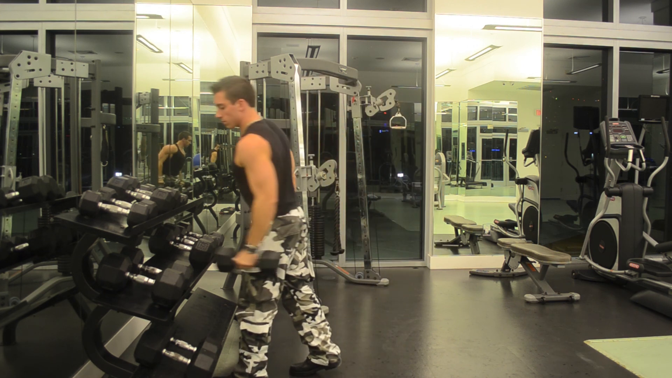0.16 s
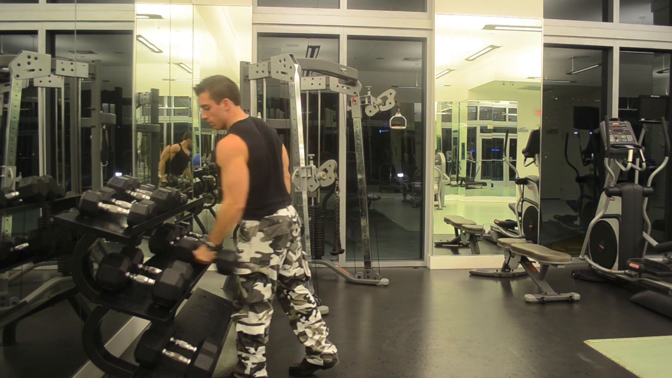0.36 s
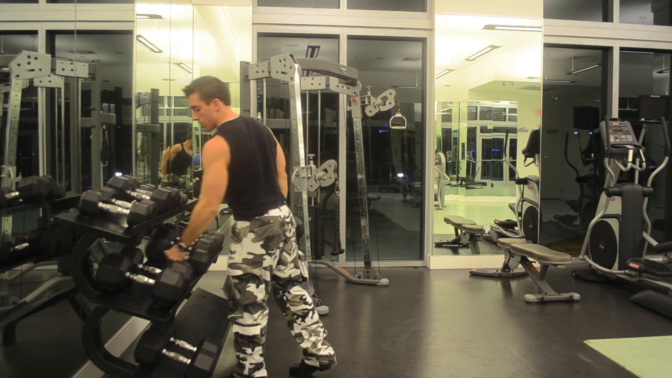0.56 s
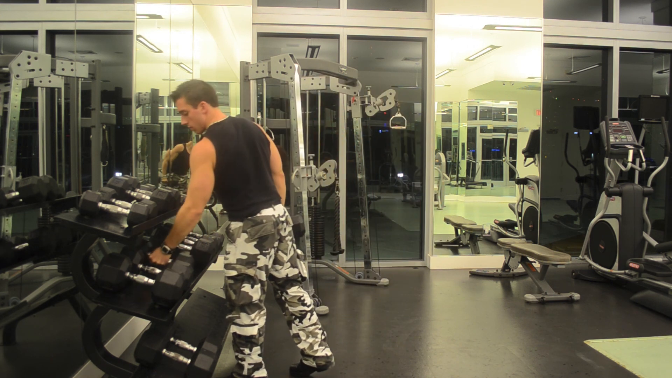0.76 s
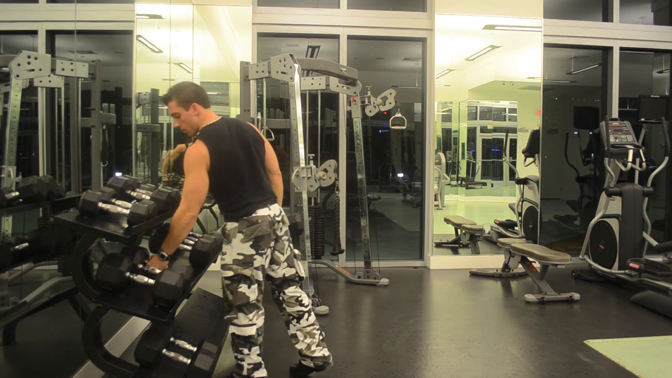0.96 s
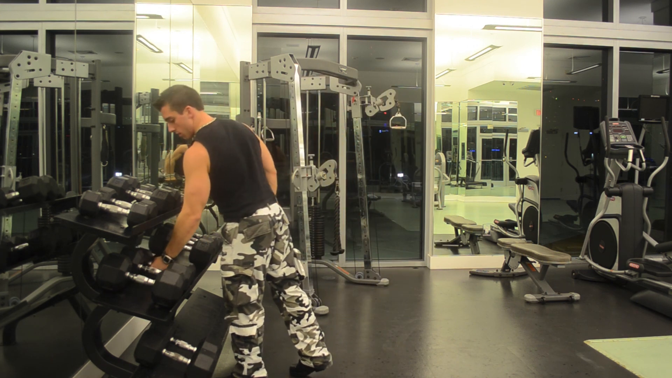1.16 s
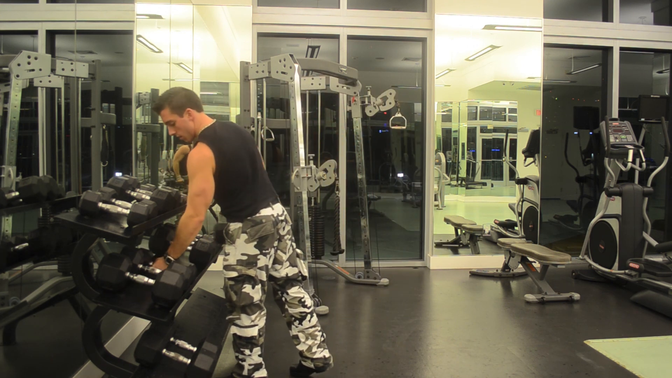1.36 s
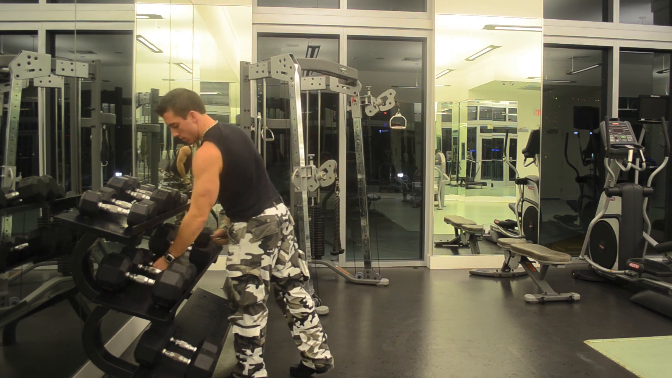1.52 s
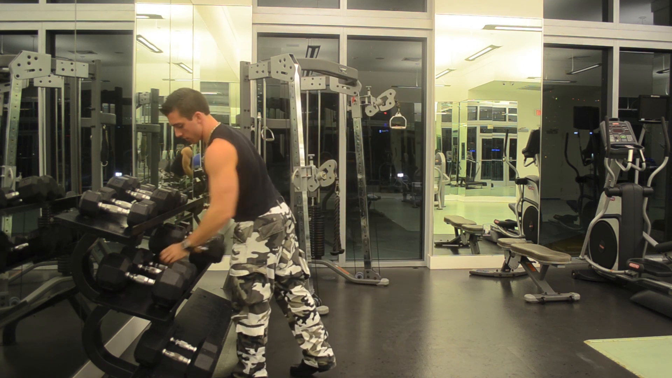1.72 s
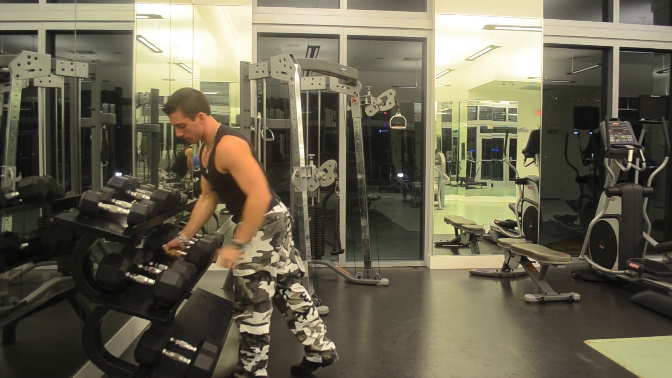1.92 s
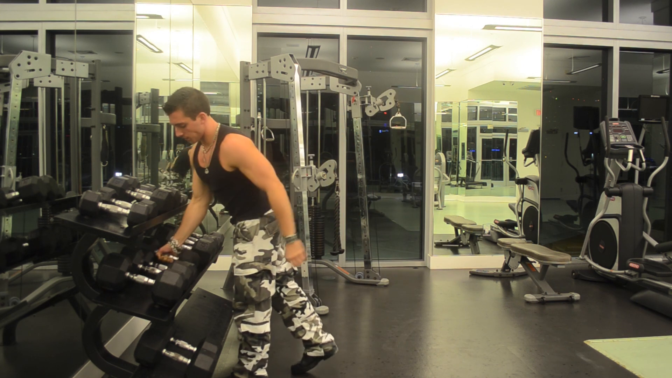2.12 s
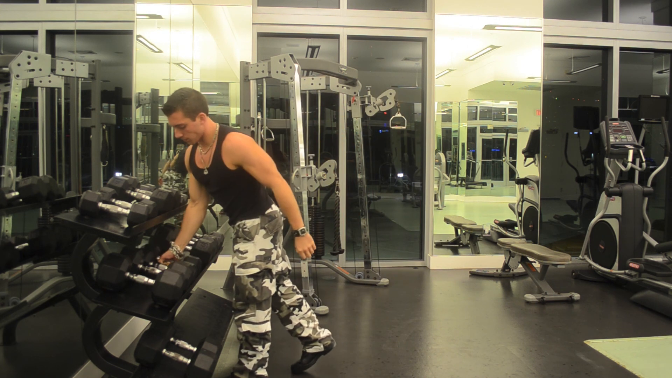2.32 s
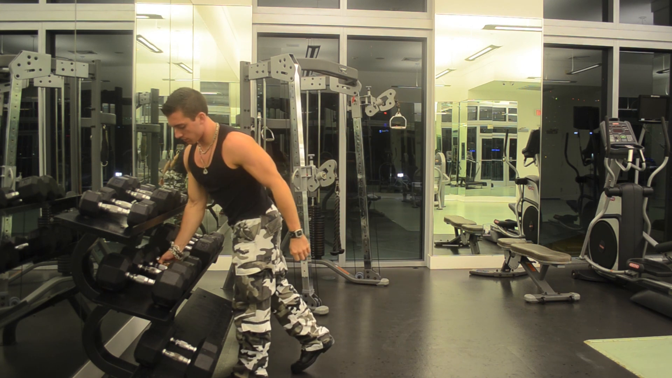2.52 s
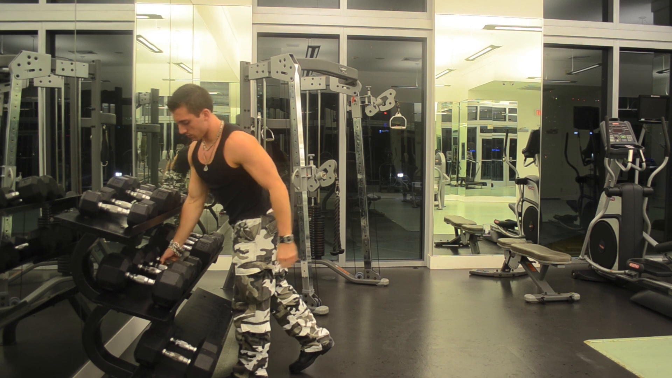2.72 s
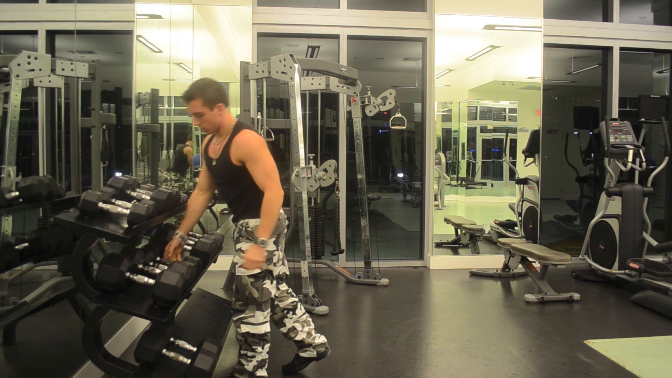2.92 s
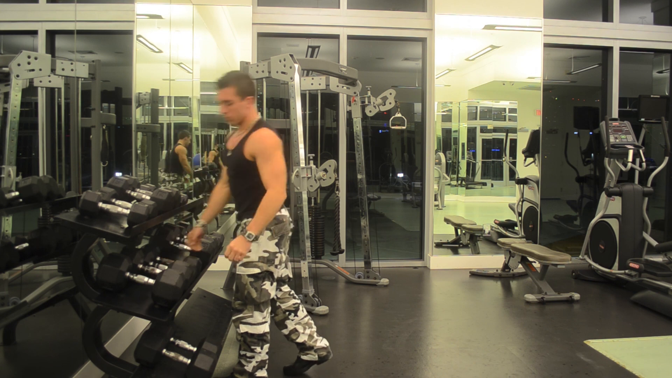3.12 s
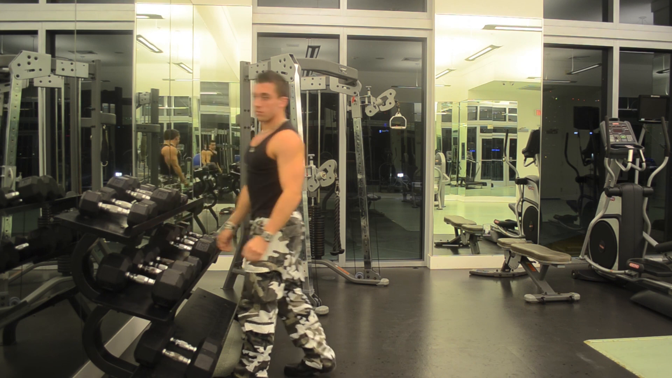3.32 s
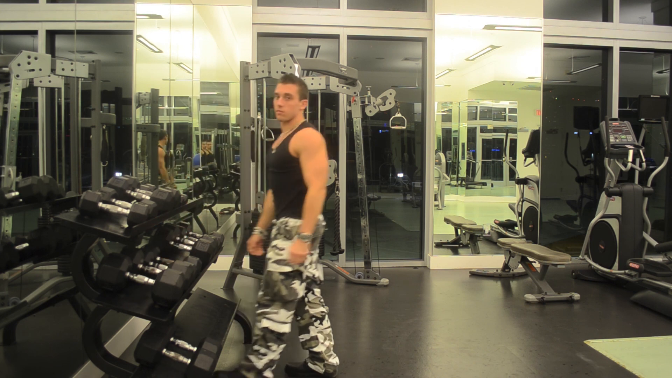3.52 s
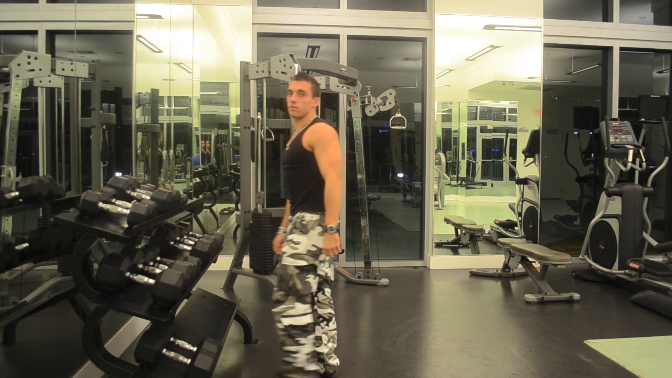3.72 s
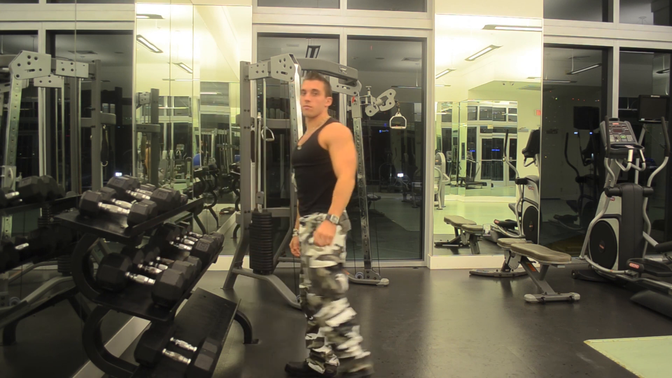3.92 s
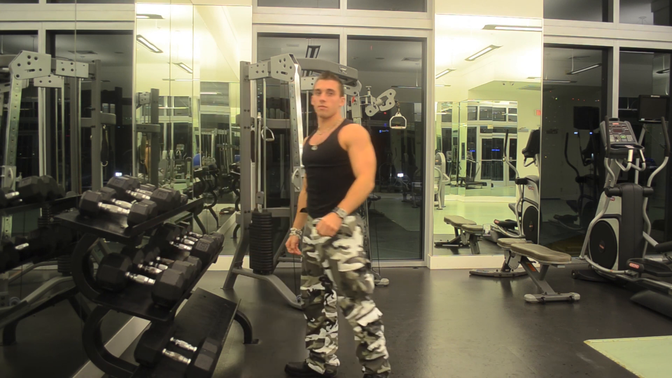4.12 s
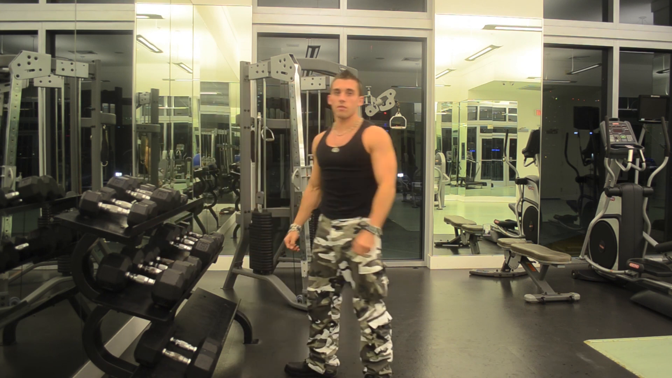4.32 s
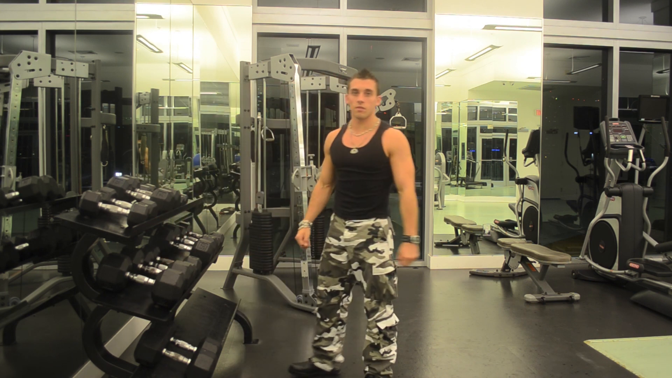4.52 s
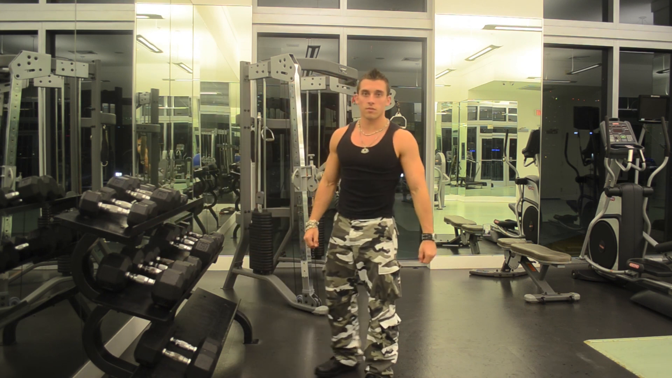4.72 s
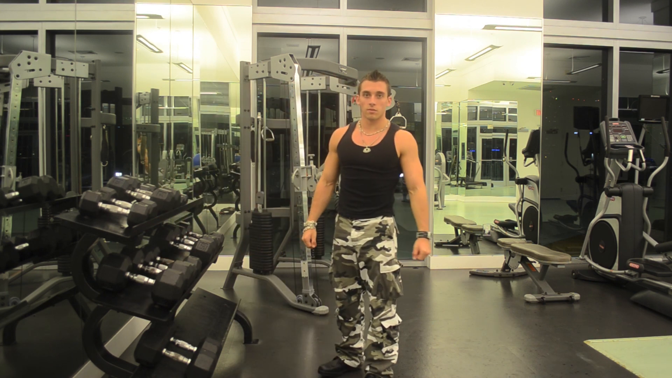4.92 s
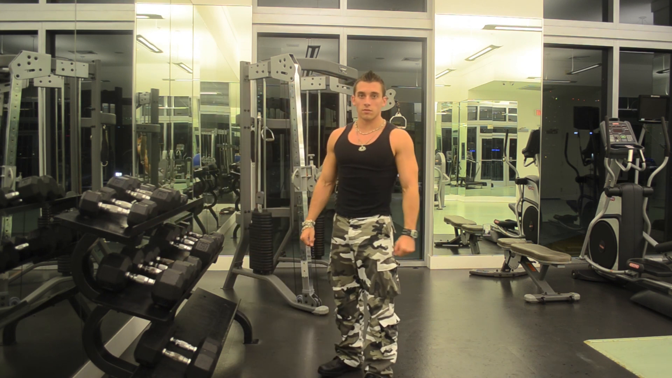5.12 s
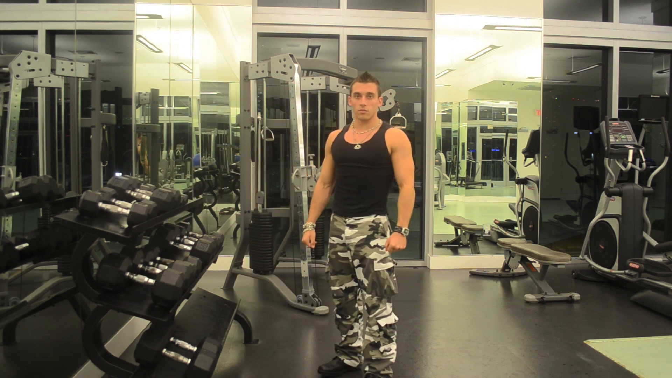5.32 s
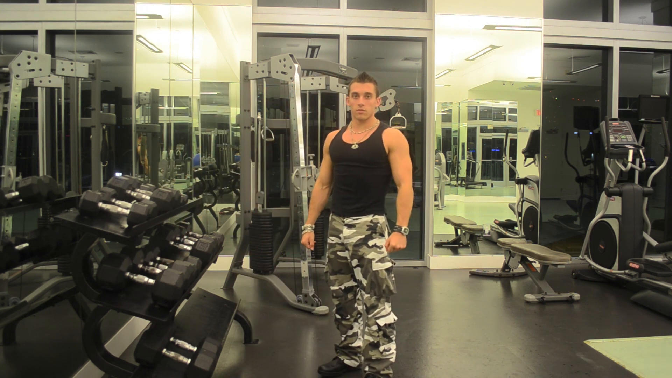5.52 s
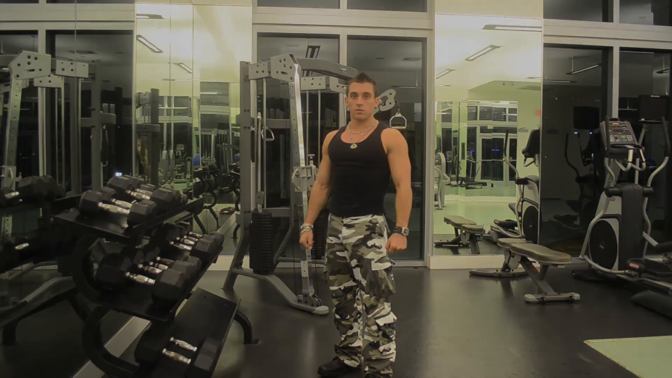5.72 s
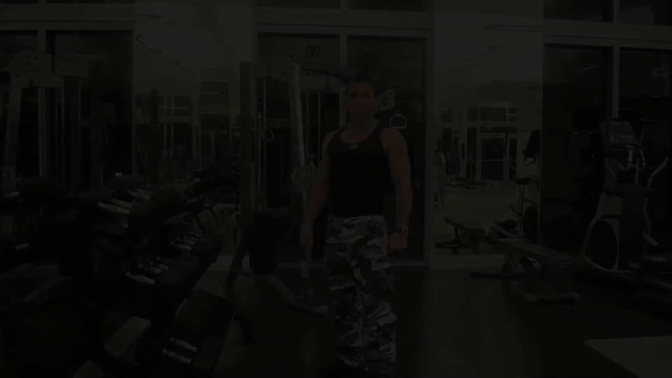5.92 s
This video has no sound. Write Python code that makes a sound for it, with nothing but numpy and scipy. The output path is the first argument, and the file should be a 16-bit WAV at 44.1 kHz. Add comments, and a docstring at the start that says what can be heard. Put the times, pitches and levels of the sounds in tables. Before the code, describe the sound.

Ventilation and a low electrical hum fill a hard-walled gym. About a second in, a rubber-coated dumbbell lands on a steel rack with a loud clank that rings briefly around the room. A second dumbbell follows, settling with quieter, dull knocks and a faint, thin squeak. Clothing rustles and ticks very softly. The microphone picks up plenty of room reverberation, and the hum fades out at the end.

```python
"""In a hard-walled gym, two rubber-coated dumbbells are set down on a steel rack.
Ventilation and mains hum fill the room, a low boom dies away, and the lifter's clothes tick and rustle.
Each impact excites the rack's modes through a springy rubber contact: the first dumbbell clanks,
the second settles with dull knocks and a thin friction squeak. The walls add reverberation,
the loud clank turns the gain down, and the sound fades out at the end."""
import sys
import numpy as np
from scipy import signal
from scipy.fft import rfft, irfft
from scipy.io import wavfile
from scipy.ndimage import uniform_filter1d

SR = 44100
rng = np.random.default_rng(int(sys.argv[2]) if len(sys.argv) > 2 else 0)


def master_out(mix):
    """Clip the mix to full scale and print it as 16-bit PCM to the path in sys.argv[1]."""
    frames = np.transpose(np.atleast_2d(mix))
    ceiling = np.clip(frames, -1, 1)
    pcm = np.round(ceiling * 32767).astype(np.int16)
    wavfile.write(sys.argv[1], SR, pcm)


N = 267069
T = np.arange(N) / SR

# spectrum of rushing air: (frequency [Hz], relative level [dB])
AIR_SPECTRUM = [(15, -28), (33, -6.5), (75, -4), (105, -6), (150, -0.5), (230, 0.5), (270, -3.5),
                (400, -3.5), (550, -8), (1200, -11), (2200, -19), (5000, -41), (8000, -49.5),
                (15000, -56.5)]
# duct resonances: (frequency [Hz], half-width [Hz], level [dB])
DUCT_RESONANCES = [(135.5, 5.7, -41.5), (199.2, 8, -46.5), (226, 14, -50.5), (716, 7.4, -52.5)]
# mains hum and a faint electronic whine: (frequency [Hz], level [dB])
HUM_TONES = [(59.3, -38), (15660, -75)]
# ticks of clothing and jewellery: (time [s], level [dB], frequency [Hz], half-width [Hz], t60 [s])
CLOTHING_TICKS = [(0.316, -62.5, 4590, 2000, .35), (1.512, -63, 10060, 3140, .03),
                  (2.733, -68, 9700, 2940, .05), (3.071, -60, 10100, 3530, .025),
                  (3.162, -59.5, 10000, 2980, .025), (4.228, -61, 9600, 800, .1)]
# swells of brushing cloth: (peak time [s], level [dB], half-length [s])
CLOTH_BRUSHES = [(.77, -74.5, .22), (1.25, -73.5, .22), (1.51, -77, .04) , (2.08, -65.5, .06),
                 (3.86, -73.5, .08)]
# spectrum of cloth friction: (frequency [Hz], relative level [dB])
CLOTH_SPECTRUM = [(1500, -16.5), (4000, -4.5), (9000, -6.5), (12000, -9), (15000, -18)]
# impacts as each dumbbell lands, rocks and settles:
# (dumbbell, time [s], strength [dB], contact frequency [Hz], contact Q, crack level [dB])
IMPACTS = [("first", 1.0232, -2.5, 1080, 0.63, -53), ("first", 1.0268, 2.2, 796, .95, -44),
           ("first", 1.0335, 2, 184, 0.45, -52), ("first", 1.0365, -2, 1140, .83, -51.5),
           ("first", 1.056, -3.5, 330, .73, -61), ("first", 1.074, 7.5, 504, 2.85, -72),
           ("second", 2.306, 0.94, 1300, 1.4, -61), ("second", 2.313, 7, 158, 2.7, -88),
           ("second", 2.322, -2.5, 444, 0.67, -91), ("second", 2.351, -3, 990, .35, -68),
           ("second", 2.360, 3, 270, 0.52, -66), ("second", 2.3745, 2.4, 380, 0.79, -77),
           ("second", 2.444, -2.5, 470, 0.77, -84), ("second", 2.545, -3, 290, .97, -86),
           ("second", 2.660, -7.5, 350, .71, -87)]
# rack modes under the first dumbbell, then the second: (frequency [Hz], relative level [dB], t60 [s])
CLANK_MODES = [(92.4, -15.5, 0.33), (136.6, -12, 0.26), (170, -6.5, 0.14), (189, -12.5, 1), (217, -10, 1),
               (286.2, -4.5, 0.35), (307.9, -6.5, 0.67), (339, -9, .35), (441, -15, .6), (499, -16, 0.75),
               (517, -7, 0.14), (574, -17, 0.31), (637, -14.5, 0.41), (656, -22, 0.71), (716, -21.5, 0.64),
               (787, -1.5, 0.12), (837, -19, 0.4), (904, -21.5, .5), (945, -22.5, 0.52), (1108, -9.5, 0.86),
               (1140, -15, 0.13), (1242, -21, .5), (1329, -9.5, 0.23), (1717, -18, 0.23), (2010, -29.5, .4),
               (2070, -20.5, 0.23), (2270, -25.5, .3)]
KNOCK_MODES = [(142.8, -5, 0.45), (172.8, -3.5, 0.32), (219, -15.5, 1), (284.6, -9.5, 0.54),
               (326, -5, 0.17), (355, -10, 0.81), (414.6, -5, 0.34), (460, -2.5, 0.083), (530, -13, 0.24),
               (673, -16.5, 0.44), (778, -16, 0.28), (1123, -18, 0.13), (1323, -22.5, .7)]
# spectra of the dense, quickly damped frame modes for each: (frequency [Hz], relative level [dB])
CLANK_SPECTRUM = [(40, -27), (90, -14), (170, -3.5), (240, 0.5), (330, 4.5), (420, 1.5), (520, 2),
                  (900, 3.5), (1350, 0), (1900, -9), (2700, -17.5), (4000, -37), (16000, -63)]
KNOCK_SPECTRUM = [(40, -27), (90, -4), (150, -9), (230, -3.5), (320, 3), (470, -0.5), (620, -6.5),
                  (1200, -14.5), (2000, -19.5), (3500, -37), (16000, -58)]
# spectrum of the metallic crack: (frequency [Hz], relative level [dB])
CRACK_SPECTRUM = [(500, -12), (2500, 5), (4000, 2.5), (5500, -2), (6800, 0), (9000, -14), (13000, -13),
                  (15000, -22.5)]
# resonances of the squeak: (frequency [Hz], half-width [Hz], relative level [dB])
SQUEAK_RESONANCES = [(9520, 260, -4), (12200, 600, -4), (12620, 130, -1.5), (13900, 120, -12.5),
                     (14230, 400, -10)]
# reverberation time of the gym: (frequency [Hz], t60 [s])
GYM_T60 = [(60, 0.33), (150, 1.05), (300, 1.8), (700, 1.45), (1400, 1.52), (2500, 2.5), (5000, 0.45),
           (14000, 0.4)]


def amp(db):
    """Amplitude ratio: tenfold for every 20 dB."""
    return 10 ** (np.asarray(db) / 20)


def unit(x):
    """Normalisation to rms 1."""
    return x / np.sqrt(np.mean(x ** 2) + 1e-20)


def curve_at(points, hz):
    """Interpolation on a logarithmic frequency axis."""
    f, value = np.transpose(points)
    return np.interp(np.log(hz + 1), np.log(f), value)


def add(mix, start_s, sound):
    """Superposition: a sound joins the mix at its start time."""
    part = mix[round(start_s * SR):][:len(sound)]
    part += sound[:len(part)]


def noise(spectrum, size):
    """Random phases under a given spectrum make coloured noise of rms 1."""
    hz = np.fft.rfftfreq(size, 1 / SR)
    phases = np.exp(2j * np.pi * rng.random(len(hz)))
    return unit(irfft(amp(curve_at(spectrum, hz)) * phases, size))


def resonance(hz, half_width, size):
    """A randomly driven resonance gives a band of noise, here of rms 1."""
    f = np.fft.rfftfreq(size, 1 / SR)
    phases = np.exp(2j * np.pi * rng.random(len(f)))
    return unit(irfft(phases / (1 + ((f - hz) / half_width) ** 2), size))


def decay(t, t60):
    """Damping: an exponential fall of 60 dB in t60 seconds."""
    return np.exp(-np.log(1000) * t / t60)


def whiten(x, smoothing_hz):
    """Spectral whitening evens out a noise burst so that it favours no pitch."""
    spectrum = rfft(x)
    power = uniform_filter1d(abs(spectrum) ** 2, int(smoothing_hz * len(x) / SR))
    return irfft(spectrum / np.sqrt(abs(power) + 1e-12), len(x))


def ventilation(air_db=-36):
    """Moving air makes broadband noise, and the ducts drone at their resonances."""
    ducts = sum(amp(db) * resonance(hz, width, N) for hz, width, db in DUCT_RESONANCES)
    return amp(air_db) * noise(AIR_SPECTRUM, N) + ducts


def hum():
    """Periodic vibration gives pure tones: mains hum and an electronic whine."""
    return sum(amp(db) * np.sqrt(2) * np.sin(2 * np.pi * (hz * T + rng.random())) for hz, db in HUM_TONES)


def boom(level_db=-31.5, rise_s=0.011):
    """A low, damped resonance dies away at the start."""
    envelope = np.minimum(T / rise_s, 1) * decay(T, t60=1)
    return amp(level_db) * envelope * resonance(hz=143, half_width=14, size=N)


def clothes():
    """Tiny impacts tick as damped resonances; friction noise swells as the lifter's cloth brushes."""
    swells = sum(amp(db) * np.exp(-((T - s) / half_s) ** 2) for s, db, half_s in CLOTH_BRUSHES)
    out = swells * noise(CLOTH_SPECTRUM, N)
    t = T[:SR // 2]
    for s, db, hz, width, t60 in CLOTHING_TICKS:
        add(out, s, amp(db) * resonance(hz, width, len(t)) * decay(t, t60))
    return out


def rack(dumbbell, modes, spectrum, ring_db, clatter_db, clatter_t60, crack_t60):
    """Modal excitation: impacts ring the modes near the rubber contact's resonance; hard ones crack."""
    t, out = T[:2 * SR], np.zeros(N)
    ring = sum((-1) ** k * amp(db) * decay(t, t60) * np.sin(2 * np.pi * hz * t)
               for k, (hz, db, t60) in enumerate(modes))
    colour = unit(amp(curve_at(spectrum, np.fft.rfftfreq(len(t), 1 / SR))))
    impacts = [row[1:] for row in IMPACTS if row[0] == dumbbell]
    for s, strength_db, contact_hz, contact_q, crack_db in impacts:
        # overlapping damped modes blur into a short burst of noise
        burst = rng.standard_normal(len(t)) * decay(t, clatter_t60)
        flat_burst = np.linalg.norm(burst) * whiten(burst, smoothing_hz=14)
        clatter = irfft(rfft(flat_burst) * colour) * (t < clatter_t60)
        frame = amp(ring_db) * ring + amp(clatter_db) * clatter
        contact = signal.iirpeak(contact_hz, contact_q, fs=SR)
        add(out, s, amp(strength_db) * signal.lfilter(*contact, frame))
        add(out, s, amp(crack_db) * noise(CRACK_SPECTRUM, len(t)) * decay(t, crack_t60))
    return out


def squeak(peak_s=2.392, peak_db=-53.5, rise_db_per_s=540, fall_db_per_s=470):
    """Friction drives high resonances as the second dumbbell slips in its cradle, until it grips."""
    level_db = peak_db - np.maximum(rise_db_per_s * (peak_s - T), fall_db_per_s * (T - peak_s))
    bands = sum(amp(db) * resonance(hz, width, N) for hz, width, db in SQUEAK_RESONANCES)
    return amp(level_db) * unit(bands)


def reverberate(x, build_s, wet_db=-3.5, absorption_hz=5000):
    """Reverberation: dense reflections build up, then decay at each band's own rate."""
    t = T[:2 * SR]
    hz, age, bands = signal.stft(rng.standard_normal(len(t)), SR, nperseg=512)
    bands = bands * decay(age, curve_at(GYM_T60, hz)[:, None])
    tail = signal.istft(bands, SR, nperseg=512)[1][:len(t)]
    onset = 1 - np.exp(-(t / build_s) ** 2)
    tail = whiten(tail * onset, smoothing_hz=6) * onset * (t < 1.3)
    # air and rubber flooring absorb the treble
    tail = signal.lfilter(*signal.butter(1, absorption_hz, fs=SR), tail / np.linalg.norm(tail))
    return x + amp(wet_db) * signal.fftconvolve(x, tail)[:N]


def gain_control(x, input_db=3, threshold_db=-20, ratio=1.33, held_rise_db_per_s=0.44):
    """Peak-hold compression: the gain drops at once above the threshold, then keeps sinking slowly."""
    level_db = 10 * np.log10(abs(uniform_filter1d(x[0] ** 2, size=600)) + 1e-12)
    drift_db = held_rise_db_per_s * T
    held_db = np.maximum.accumulate(level_db - drift_db) + drift_db
    reduction_db = np.maximum(held_db - threshold_db, 0) * (1 - 1 / ratio)
    return x * amp(input_db - reduction_db)


def scene():
    """Superposition of the room's background and the reverberant sounds of lifter and rack."""
    background = ventilation() + hum() + boom()
    rustle = clothes()
    clank = rack("first", CLANK_MODES, CLANK_SPECTRUM,
                 ring_db=-14.5, clatter_db=-10, clatter_t60=0.17, crack_t60=0.07)
    knocks = rack("second", KNOCK_MODES, KNOCK_SPECTRUM,
                  ring_db=-24.5, clatter_db=-21, clatter_t60=0.16, crack_t60=0.05)
    small_sounds = reverberate(rustle + squeak(), build_s=0.012)
    dumbbells = reverberate(clank + knocks, build_s=0.035)
    return (background + small_sounds + dumbbells)[None]


def record(dry, fade_start_s=5.597, fade_end_s=6.021, cutoff_hz=15800):
    """Compression and soft saturation tame the peaks; a linear fade and a low-pass filter follow."""
    compressed = gain_control(dry)
    saturated = compressed / (1 + compressed ** 8) ** (1 / 8)
    fade = np.clip((fade_end_s - T) / (fade_end_s - fade_start_s), 0, 1)
    low_pass = signal.firwin(1023, cutoff_hz, window=("kaiser", 9), fs=SR)
    return signal.oaconvolve(saturated * fade, low_pass[None], "same")


dry = scene()
out = record(dry)
master_out(out)
```